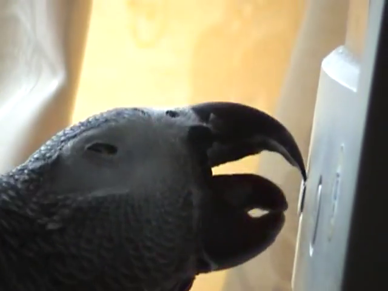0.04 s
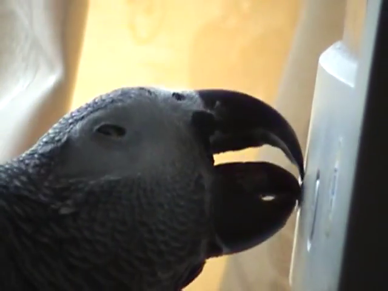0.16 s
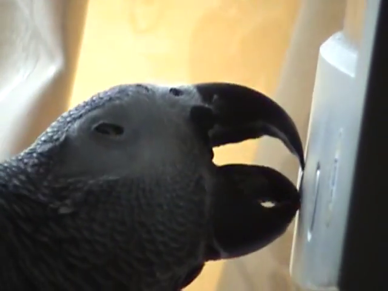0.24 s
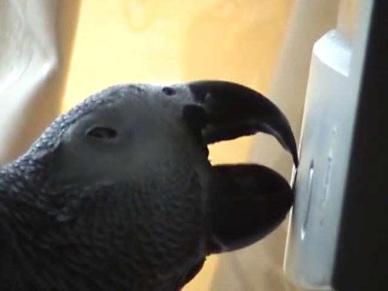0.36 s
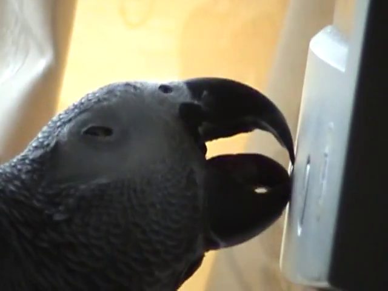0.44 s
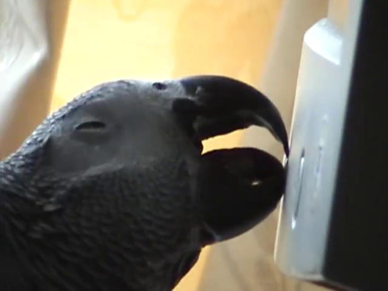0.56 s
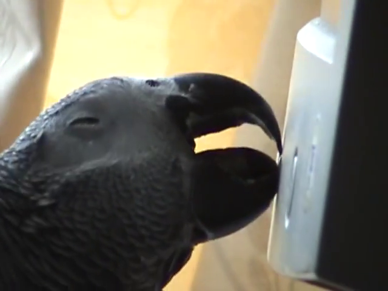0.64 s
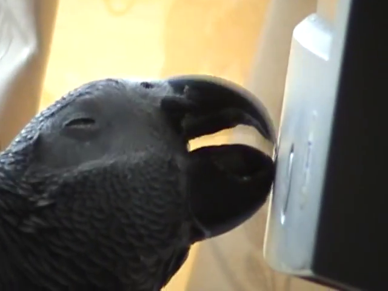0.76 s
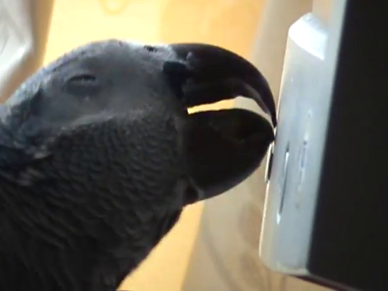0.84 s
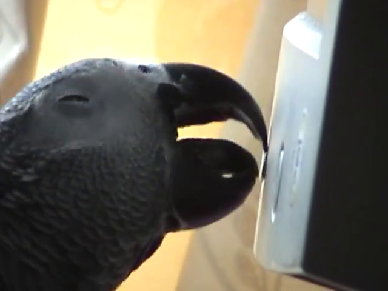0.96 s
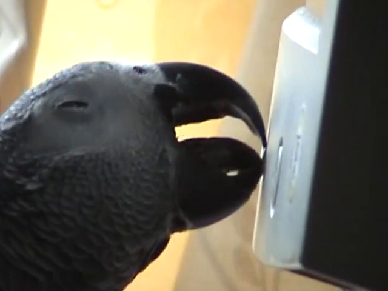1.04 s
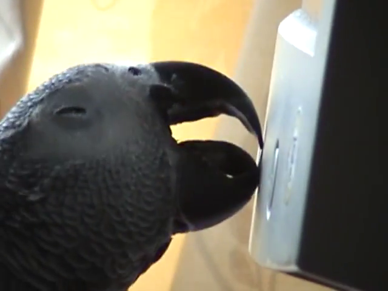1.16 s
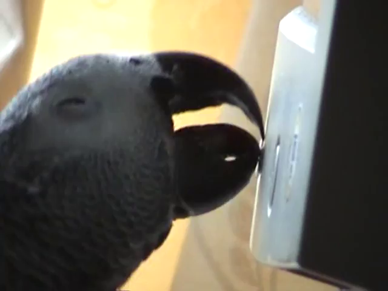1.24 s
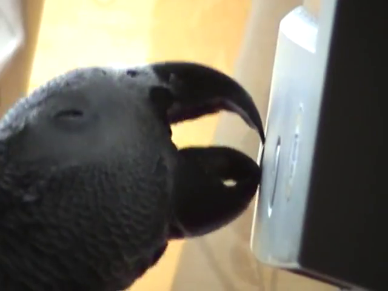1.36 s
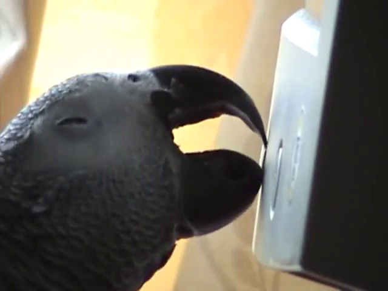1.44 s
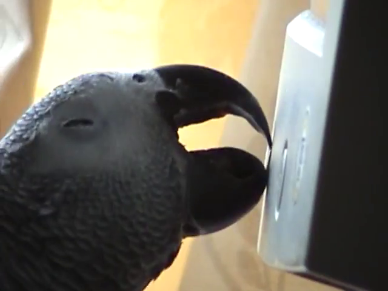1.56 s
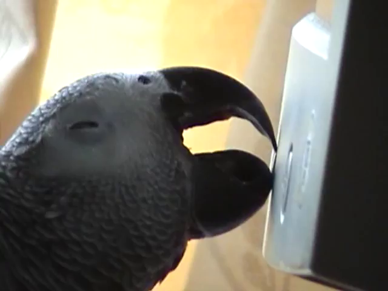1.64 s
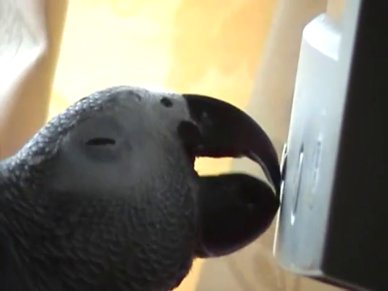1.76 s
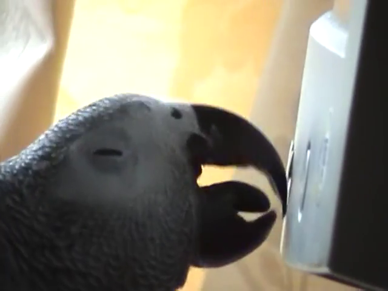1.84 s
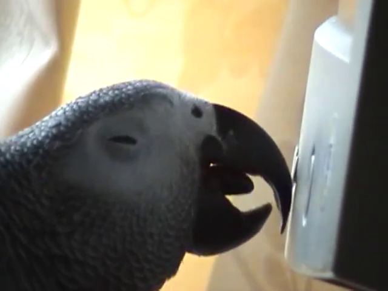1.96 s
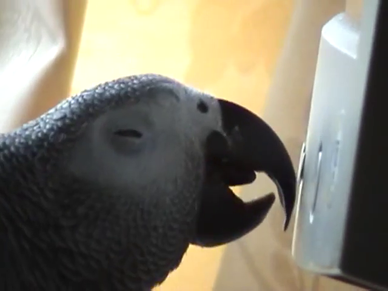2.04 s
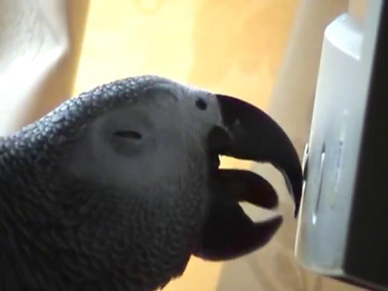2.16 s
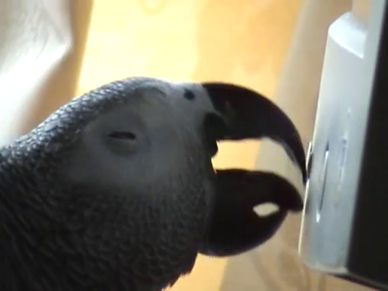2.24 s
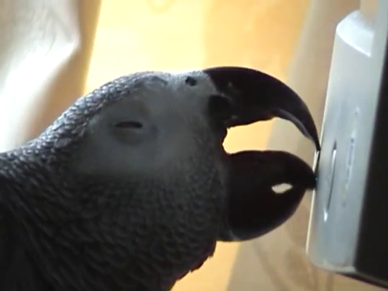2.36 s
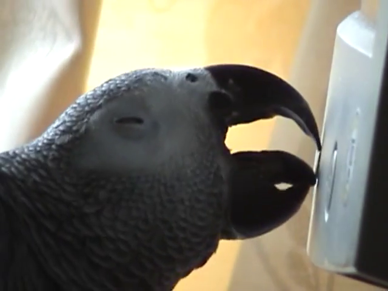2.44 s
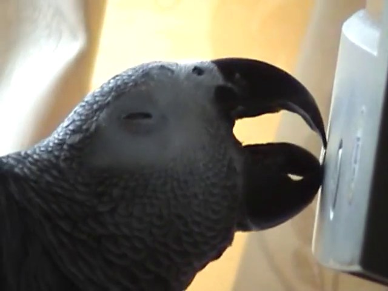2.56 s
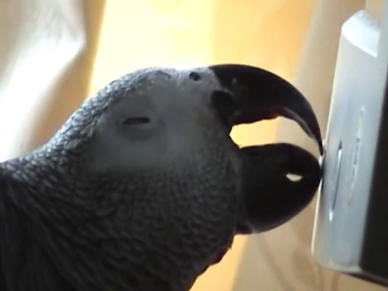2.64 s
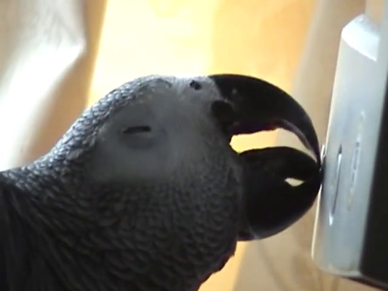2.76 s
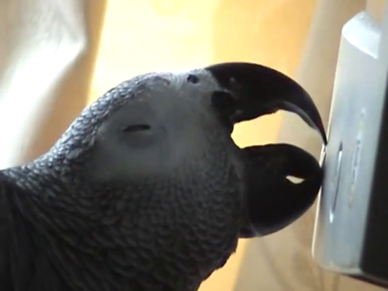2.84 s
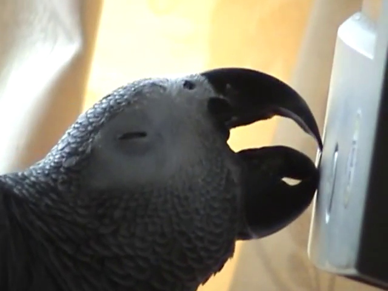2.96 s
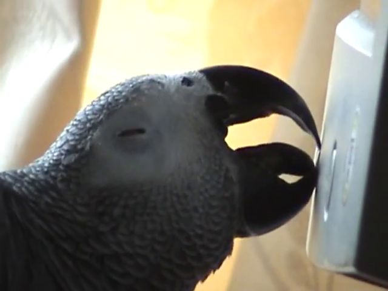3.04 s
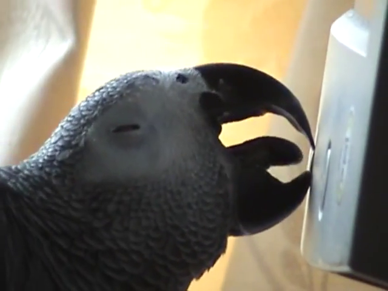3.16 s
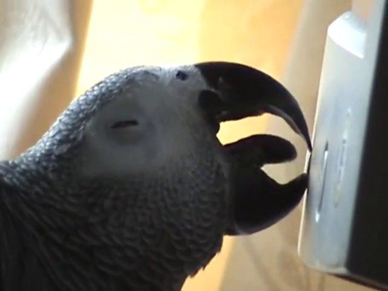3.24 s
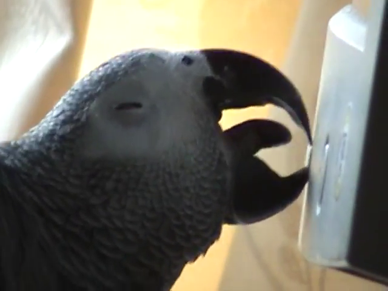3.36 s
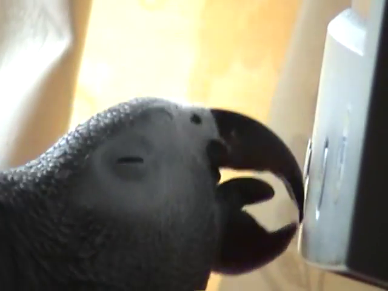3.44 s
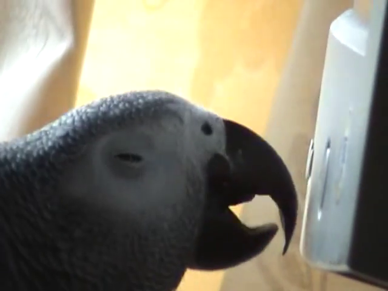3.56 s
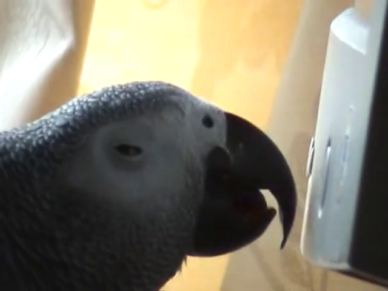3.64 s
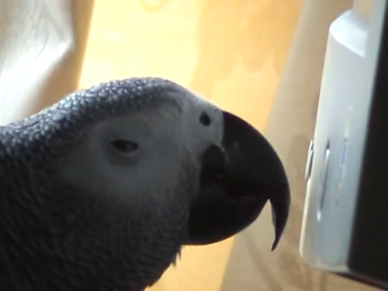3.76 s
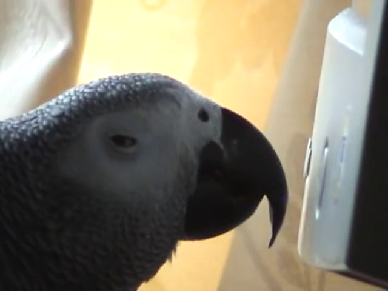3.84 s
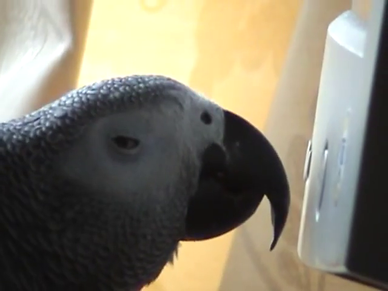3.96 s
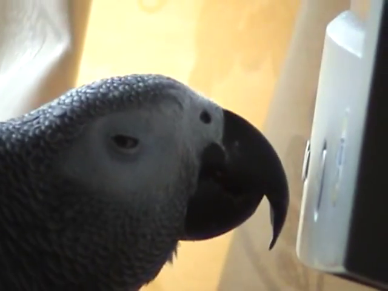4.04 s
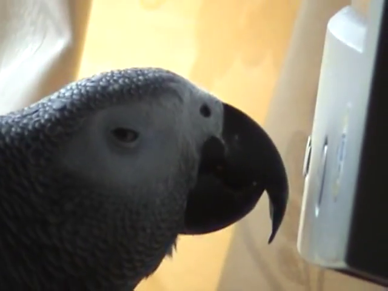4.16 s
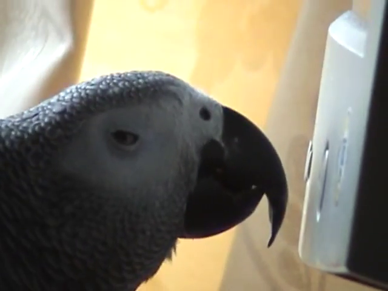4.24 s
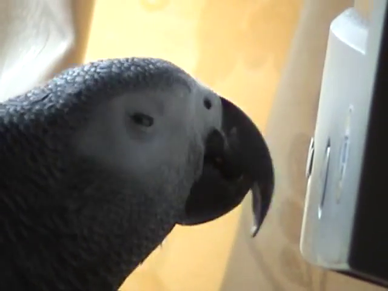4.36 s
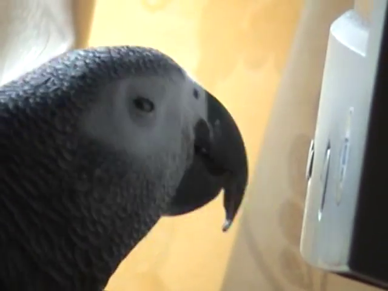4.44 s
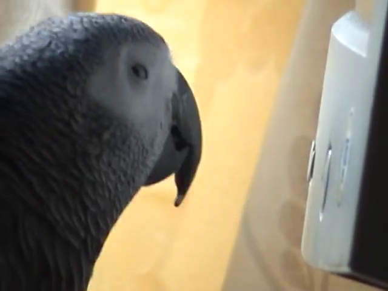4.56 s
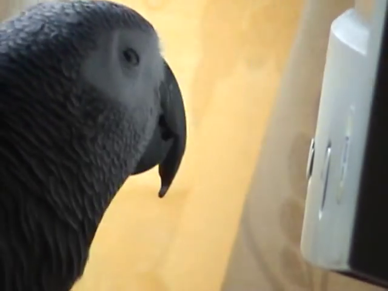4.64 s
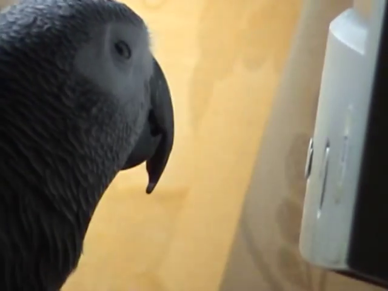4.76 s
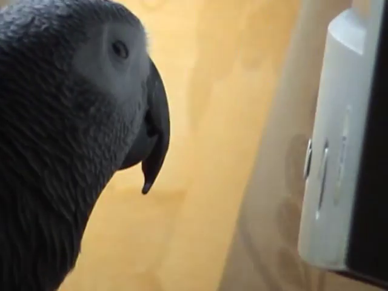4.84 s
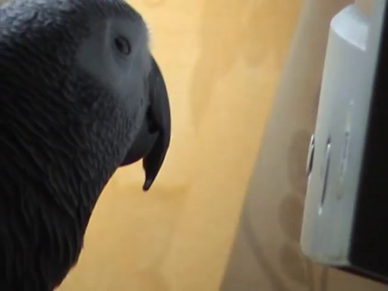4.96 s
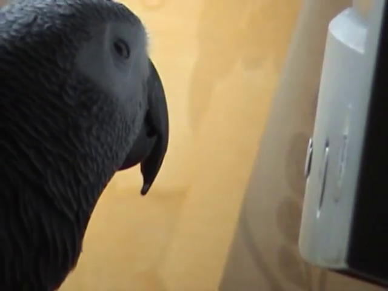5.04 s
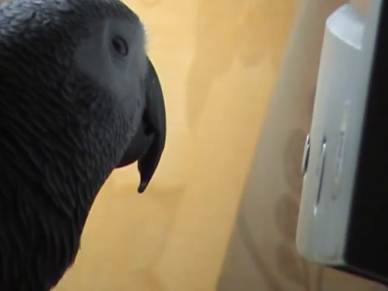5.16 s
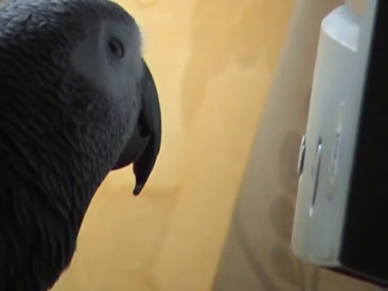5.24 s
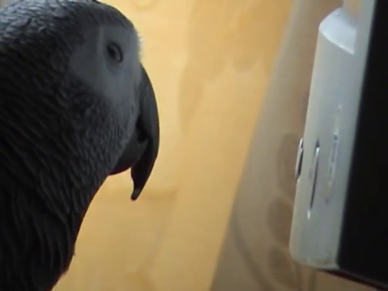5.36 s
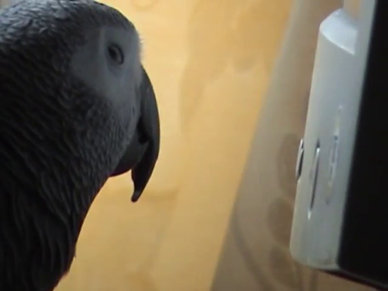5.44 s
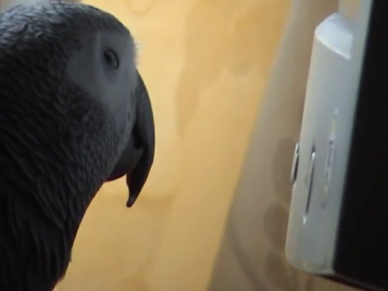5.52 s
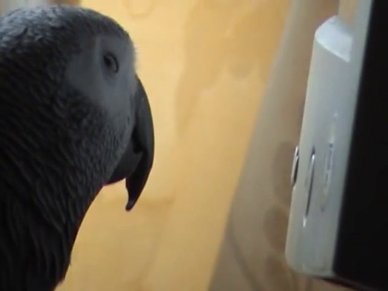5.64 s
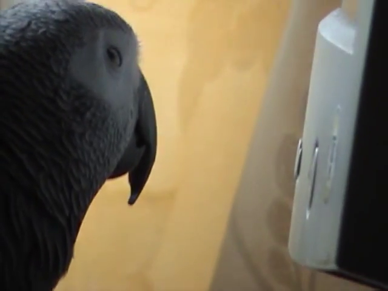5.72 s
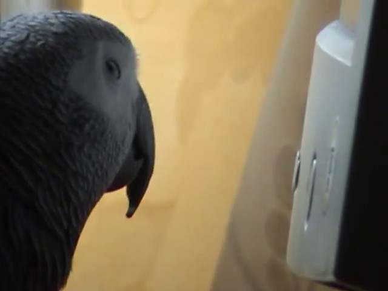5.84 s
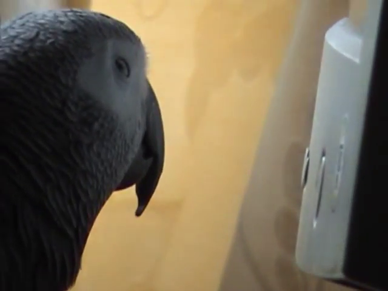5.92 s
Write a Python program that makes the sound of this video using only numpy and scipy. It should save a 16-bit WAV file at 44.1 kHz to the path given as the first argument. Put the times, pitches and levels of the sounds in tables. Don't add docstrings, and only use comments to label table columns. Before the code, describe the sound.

A parrot works its beak against a hollow hard-plastic casing, very close to a camera's stereo microphone in a small, bright room. From 0 to 0.7 s come light pecks and soft knocks over a grainy scrape that eases off. Around 0.85 s a stronger rap makes the shell boom; from 1.15 to 1.6 s a busy cluster follows, with its hardest knock near 1.3. At 1.8 s a huge sharp snap cracks, clipped, with ringing plastic, dense short echoes and a low thump. Rubbing resumes, and knocks return from 2.3 to 3.0 s, strongest near 2.7, with a tiny high tongue tick at 2.57. A second, brighter snap hits at 3.44 s and ends the scraping. A faint knock at 3.7 s is the last contact. Until about 6 s only air hiss, soft low hum and a thin, wavering high motor whine with brief swells remain.

```python
import sys
import numpy as np
from scipy import signal
from scipy.fft import rfft, irfft, next_fast_len
from scipy.io import wavfile
from scipy.ndimage import uniform_filter1d, minimum_filter1d, map_coordinates

SR = 44100
rng = np.random.default_rng(int(sys.argv[2]) if len(sys.argv) > 2 else 0)


def waveform_to_disk(signal):
    frames = np.transpose(np.atleast_2d(signal))
    scaled = np.clip(frames, -1, 1) * 32767
    samples = np.round(scaled).astype(np.int16)
    wavfile.write(sys.argv[1], SR, samples)


def volts_from_db(level):
    exponent = np.asarray(level, float) / 20
    return 10 ** exponent


N = 264159


def along(points, hz):
    f, v = np.transpose(points)
    return np.interp(np.log(hz + 1), np.log(f + 1), v)


def unit(x):
    return x / np.sqrt(np.mean(x ** 2) + 1e-20)


def filtered(x, response):
    m = next_fast_len(x.shape[-1] + 8192)
    spectrum = rfft(x, m) * response(np.fft.rfftfreq(m, 1 / SR))
    return irfft(spectrum, m)[..., :x.shape[-1]]


def peak(f, hz, width):
    damping = 1j * f * width
    return damping / (hz * hz - f * f + damping)


def narrow(hz, width):
    return unit(filtered(rng.standard_normal(N), lambda f: peak(f, hz, width) ** 2))


def spread(pair, alike):
    def mid_and_side(hz):
        angle = np.arccos(np.clip(along(alike, hz), -1, 1)) / 2
        return np.array([np.cos(angle), np.sin(angle)])
    mid, side = filtered(pair, mid_and_side)
    return np.array([mid + side, mid - side])


# frequency in Hz, density in dB per Hz.
AIR_COLOUR = [(20, -90.5), (45, -69.5), (100, -77), (200, -74.5), (400, -76), (850, -80.5), (1100, -83.5),
              (1500, -86.5), (1800, -85), (2300, -89.5), (4300, -93.5), (5600, -97), (9000, -98.5),
              (15000, -97.5)]
# frequency in Hz, likeness from -1 to 1.
AIR_LIKENESS = [(60, 0.61), (130, 0.42), (290, 0.17), (630, 0.51), (1390, 0.011), (3050, -0.25),
                (6690, 0.49), (14700, -0.32)]
# frequency in Hz, width in Hz, level in dB.
HUM_LINES = [(53.6, 9.234, -52.5), (75.9, 16, -58), (150.1, 17, -56), (216.6, 10.4, -62), (437, 6, -61),
             (629.4, 13.5, -60), (843, 16, -67), (2065, 40, -73)]


def room_tone():
    air = filtered(rng.standard_normal((2, N)),
                   lambda hz: volts_from_db(along(AIR_COLOUR, hz) + 0.31) * np.sqrt(SR / 2))
    hum = sum(volts_from_db(db) * narrow(hz, width) for hz, width, db in HUM_LINES)
    return volts_from_db([[-0.6], [0.6]]) * (spread(air, AIR_LIKENESS) + hum)


# frequency in Hz, width in Hz, level in dB over the plain blow.
CASING_MODES = [(415, 54, -7.5), (627.4, 59, 6.5), (709, 21, -1), (820, 7.8, 0.5), (911, 17, 7),
                (1165, 20, -9.5), (1310, 27, 0.5), (1470, 21, -39), (1920, 54, -2.5), (2170, 23, -5.5),
                (2694, 65, -7.5), (3156, 23, 0.5), (3440, 94, 4.5), (3770, 35, 6.5)]


def casing(f, scatter_db):
    response = 1
    for hz, width, db in CASING_MODES:
        response = response + volts_from_db(db + scatter_db * rng.standard_normal()) * peak(f, hz, width)
    return response


# time in seconds, level in dB.
SLIDE_LEVEL = [
    (0, -39.5),
    (.35, -53.5),
    (1.05, -51.5),
    (1.4, -45.5),
    (1.56, -47.5),
    (2.0, -52),
    (2.23, -45.5),
    (2.86, -50),
    (3.3, -59),
]


def slide():
    grain_db = 2.5 * unit(uniform_filter1d(rng.standard_normal(N), size=500))
    slips = rng.standard_normal((2, N)) * volts_from_db(grain_db)
    colour = [(200, -14), (600, -0.5), (1000, -9.5), (2200, -9), (6000, -50)]  # (Hz, dB)
    scrape = filtered(slips, lambda hz: casing(hz, 0) * volts_from_db(along(colour, hz)))
    t = np.arange(N) / SR
    level_db = np.interp(t, *np.transpose(SLIDE_LEVEL)) - 4.5
    touching = t < 3.44
    return volts_from_db(level_db) * touching * unit(scrape)


# frequency in Hz, density in dB per Hz.
BLOW_COLOUR = [(60, -57), (200, -40), (400, -6), (650, -5), (1600, -3), (3500, -6), (8000, -6.5),
               (10500, -9), (13000, -16.5), (15000, -18.5)]
# frequency in Hz, decay time t60 in seconds.
ROOM_DECAY = [(200, 0.45), (650, 0.24), (2000, 0.31), (6000, 0.25), (12000, 0.19)]
# frequency in Hz, rise time in seconds.
MODE_RISE = [(300, 0.028), (800, 0.011), (1300, .0012), (16000, 0.0004)]


def contact(knock_db, mid_db, bite_db, tick_db, stretch, attack, late):
    size = SR // 3
    hz, t, z = signal.stft(rng.standard_normal((2, size)), SR, nperseg=256)
    tilt_db = along([(650, 0.0042), (1600, mid_db), (3500, bite_db), (8000, tick_db)], hz)
    colour_db = (along(BLOW_COLOUR, hz) + tilt_db)[:, None]
    fall_db = 60 * t / (stretch * along(ROOM_DECAY, hz)[:, None])
    swell = 1 - late * np.exp(-t / along(MODE_RISE, hz)[:, None])
    burst = signal.istft(z * swell * volts_from_db(colour_db - fall_db), SR, nperseg=256)[1][:, :size]
    rise = 1 - np.exp(-np.arange(size) / SR / attack)
    return volts_from_db(knock_db + 8.5) * burst * rise


def strike(blows, attack, late, lead, scatter_db):
    out = np.zeros((2, N))
    for s, *colour in blows:
        blow = filtered(contact(*colour, attack, late), lambda f: casing(f, scatter_db))
        start = round((s - lead) * SR)
        out[:, start:start + blow.shape[1]] += blow
    return out


def harder(base_db, hardens, hardness_db):
    return np.array(base_db) + np.array(hardens) * hardness_db


# start in seconds, knock level in dB at 650 Hz,
# hardness in dB, extra edge in dB when it lands near the thin rim.
PECK_EVENTS = [(.004, -41.5, 8.5, -5), (.109, -31.5, -8, 1), (.17, -33, -1, 0), (.395, -36, -3, 7),
               (.445, -32, -2.5, 2.5), (.83, -25.5, 1, 7), (.867, -17, 2, -2), (.879, -25.5, 4.5, -1),
               (.998, -28, 5, -3.5), (1.254, -32, -3, -3), (1.286, -31.5, 6.5, -3), (1.347, -34, 1, 6.5),
               (1.434, -32.5, 6.5, -1), (1.544, -29, -1, -2), (2.295, -43.5, 1.5, 7.5),
               (2.373, -28.5, 0.5, 5.5), (2.557, -45, -3, 2), (2.578, -35.5, 3.5, 4), (2.894, -32, -3, 1),
               (2.948, -23.5, -4.5, 4), (2.984, -33, -11, 1)]


def pecks():
    blows = []
    for s, db, hardness, edge_db in PECK_EVENTS:
        mid, bite, click = harder((-7, -13.5, -21.5), (1, 0.74, 1.7), hardness)
        blows.append((s, db, mid + edge_db, bite, click, 0.88))
    return strike(blows, attack=0.002, late=0.3, lead=0.003, scatter_db=4)


# start in seconds, peak in dB, decay time t60 in seconds.
BOOM_EVENTS = [
    (.076, -39, 0.39),
    (.36, -40.5, 1),
    (.502, -38, 0.43),
    (.9, -26, 0.37),
    (1.184, -33.5, 0.27),
    (1.292, -27, 0.11),
    (1.33, -27, 0.089),
    (1.55, -37.5, 0.26),
    (2.376, -35, 0.63),
    (2.666, -28.5, .27),
]


def ring(s, hz, db, t60):
    t = np.arange(SR // 3) / SR
    envelope = volts_from_db(db - 60 * t / t60) * (1 - np.exp(-t / 0.0029))
    wave = envelope * np.sin(2 * np.pi * hz * t)
    return np.pad(wave, (round(s * SR), N))[:N]


def throbbing(s, hz, db, t60):
    return ring(s, hz, db, t60) + ring(s, hz + 26.5, db - 6.5, t60)


def booms():
    return sum(throbbing(s, 642, db, t60) for s, db, t60 in BOOM_EVENTS)


# start in seconds, frequency in Hz, peak in dB.
PING_EVENTS = [(.004, 2760, -50), (.69, 817, -43), (.83, 3480, -44), (0.831, 1830, -39), (.868, 923, -39),
               (0.997, 1310, -45), (1.152, 2170, -45.5), (1.152, 928, -42), (1.359, 950, -43),
               (1.437, 2170, -43), (2.373, 1880, -41), (2.374, 1310, -43), (2.374, 2450, -45),
               (2.666, 1900, -48), (2.902, 2010, -46), (2.947, 708, -37), (3.7, 805, -44)]


def pings():
    return sum(throbbing(s, hz, db, 0.27 * (1000 / hz) ** 0.2) for s, hz, db in PING_EVENTS)


# start in seconds, knock level in dB at 650 Hz,
# hardness in dB, decay stretch as a ratio.
KNOCK_EVENTS = [(.078, -33, 2.5, 1), (.261, -32, 2, 0.35), (.354, -33.5, 3, 1), (.503, -25, -3.5, 0.64),
                (.533, -38, -5, 0.61), (.691, -35, -7, .54), (.903, -38, 16, .91), (1.15, -32, 2, .91),
                (1.186, -30.5, -1, .49), (1.212, -36, -1, .87), (1.294, -18, 5, .39), (1.33, -24, 0, 0.52),
                (1.584, -48, 3, .84), (2.414, -24, 0, 0.45), (2.665, -20.5, 0.5, 0.82),
                (2.699, -18.5, -7, 0.38), (3.696, -34.5, 2, 1)]


def knocks():
    blows = []
    for s, db, hardness, stretch in KNOCK_EVENTS:
        colour = harder((-16.5, -22, -32), (1.4, 0.81, 1), hardness)
        blows.append((s, db, *colour, stretch))
    return strike(blows, attack=0.002, late=0.3, lead=0.003, scatter_db=4)


# start in seconds, end in seconds, load in dB over idle.
MOTOR_SPELLS = [(.23, 0.5, 8), (.88, .966, 11), (1.138, 1.382, 9), (1.662, 1.735, 8), (2.03, 2.163, 8.5),
                (2.397, 2.587, 9), (2.79, 2.917, 10), (3.3, 3.495, 11), (4.05, 4.16, 10), (4.315, 4.49, 8),
                (4.695, 4.803, 9), (5.193, 5.47, 9), (5.96, 6.05, 10)]


def motor_load():
    t = np.arange(N) / SR
    load_db = sum(db * ((t > start) & (t < end)) for start, end, db in MOTOR_SPELLS)
    return uniform_filter1d(load_db, size=1300)


# frequency in Hz, width in Hz, idle level in dB,
# share of the load it follows as a ratio.
WHINE_PARTIALS = [(3360, 49, -71.5, 0.092), (3273, 200, -67, 0.18), (3744, 120, -74.5, 0.08555),
                  (4893, 260, -72.5, 1.23), (5060, 24, -78, 0.1), (6800, 32, -82.5, 0.085)]
# frequency in Hz, level in dB.
SPINDLE_TONES = [(5050, -71.5), (3360, -75)]


def motor():
    load_db = motor_load()
    whine = sum(volts_from_db(db + share * load_db) * narrow(hz, width) for hz, width, db, share in WHINE_PARTIALS)
    drift, knots_per_s = 0.004, 1.9
    wander = map_coordinates(rng.standard_normal(40), [np.arange(N) * knots_per_s / SR])
    turned = np.cumsum(1 + drift * wander) / SR
    tones = sum(volts_from_db(db) * np.sqrt(2) * np.sin(2 * np.pi * hz * turned) for hz, db in SPINDLE_TONES)
    return whine + tones


# start in seconds, knock level in dB at 650 Hz, then dB against the knock
# at 1.6, 3.5 and 8 kHz, decay stretch as a ratio.
SNAP_EVENTS = [
    (1.793, -5.5, -6, -9, -6.5, 0.97),
    (3.444, -5.5, -5.5, -3, 0.5, 0.96),
]


def snaps():
    hidden_db = 10
    blows = [(s, db + hidden_db, *colour) for s, db, *colour in SNAP_EVENTS]
    return strike(blows, attack=0.0003, late=0.97, lead=0.0001, scatter_db=1.5)


# frequency in Hz, peak in dB, decay time t60 in seconds.
SNAP_MODES = [
    [(891, -12.5, 0.21), (1142, -19, 0.3), (1440, -12, 0.216), (707, -8, .27)],
    [(2716, -11, 0.24), (3123, -13, 0.23), (758, -11.5, 0.26), (624, -13.5, 0.33)],
]


def snap_rings():
    out = 0
    for snap, modes in zip(SNAP_EVENTS, SNAP_MODES):
        for hz, db, t60 in modes:
            out = out + throbbing(snap[0] + 6.5 / hz, hz, db, t60)
    return out


def tongue_tick():
    s, db, hz, width, t60 = 2.574, -37, 7000, 1900, 0.17
    t = np.arange(N) / SR - s
    fading = (t > 0) * volts_from_db(db - 60 * np.abs(t) / t60) * rng.standard_normal((2, N))
    return filtered(fading, lambda f: peak(f, hz, width) ** 2)


# frequency in Hz, likeness from -1 to 1.
BEAK_LIKENESS = [(250, 1), (700, .97), (1500, 0.93), (3000, 0.83), (8000, 0.86), (11500, 0.71), (13000, .3)]


def scene():
    beak = slide() + pecks() + knocks() + snaps() + tongue_tick()
    casing_rings = booms() + pings() + snap_rings()
    return room_tone() + spread(beak, BEAK_LIKENESS) + casing_rings + motor()


# frequency in Hz, level in dB, decay time t60 in seconds.
INPUT_THUMPS = [
    (26, -25, .11),
    (26, -22, 0.17),
]


def input_jolt():
    return sum(ring(snap[0], *thump) for snap, thump in zip(SNAP_EVENTS, INPUT_THUMPS))


def above(x, edge_hz):
    return filtered(x, lambda hz: np.clip((hz - edge_hz) / 300 + 0.5, 0, 1))


def top_cut(x):
    return signal.sosfilt(signal.butter(12, 15270, fs=SR, output="sos"), x)


def record(dry):
    span = round(0.024 * SR)
    level = np.sqrt(np.abs(uniform_filter1d(np.mean(dry ** 2, axis=0), span)))
    held = dry * np.minimum(1, volts_from_db(-7.5) / (level + 1e-9))
    clipped = held / (1 + np.abs(held) ** 8) ** (1 / 8)
    upper = above(clipped, 13700)
    top = above(clipped, 14500)
    quiet = minimum_filter1d(1.0 * (level < volts_from_db(-19)), size=500)
    faint = uniform_filter1d(quiet, span)
    busy = uniform_filter1d(1.0 * (motor_load() > 8), span)
    lost = faint * (top + busy * (upper - top))
    return top_cut(clipped + input_jolt() - lost)


dry = scene()
out = record(dry)
waveform_to_disk(out)
```